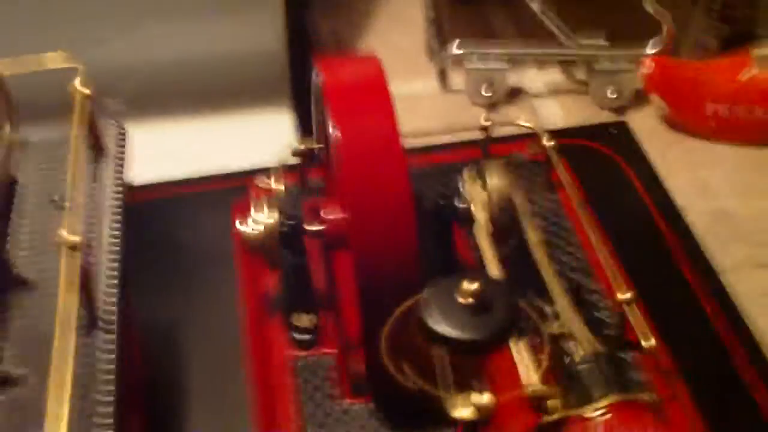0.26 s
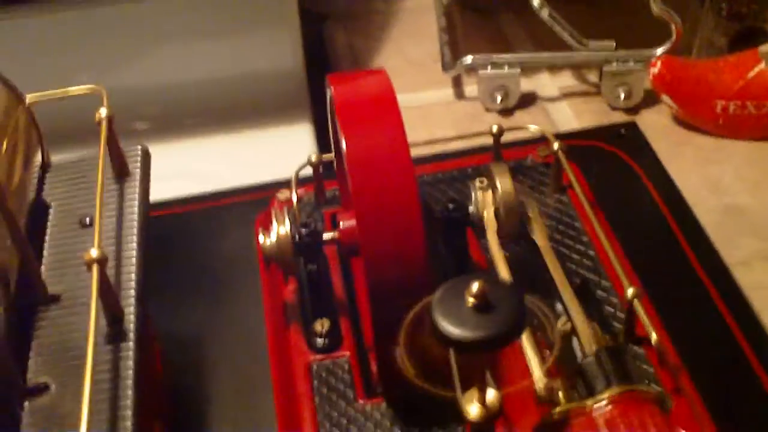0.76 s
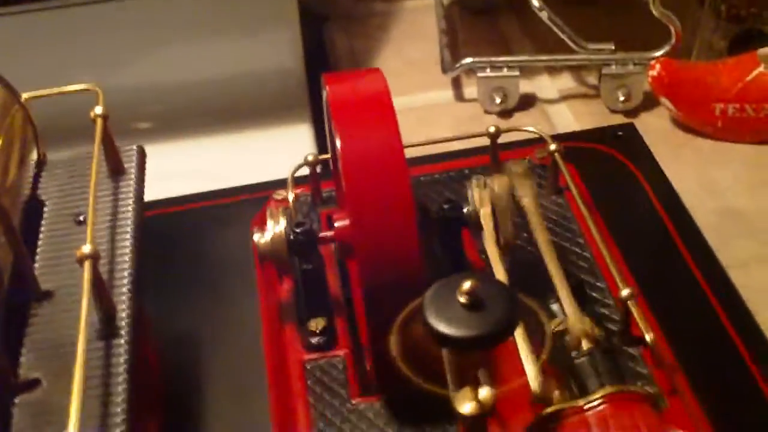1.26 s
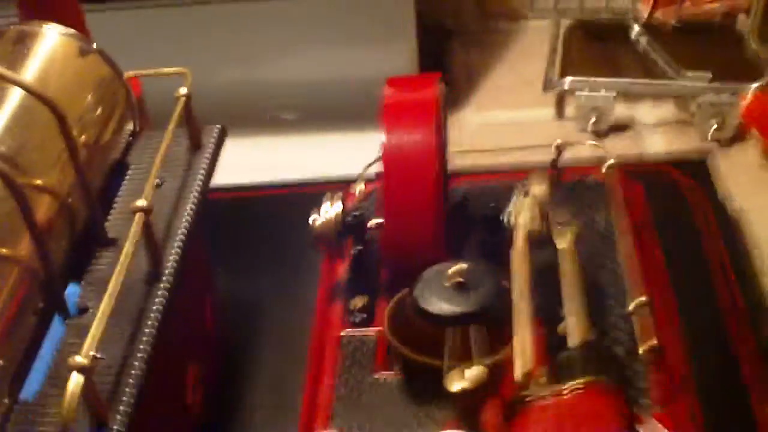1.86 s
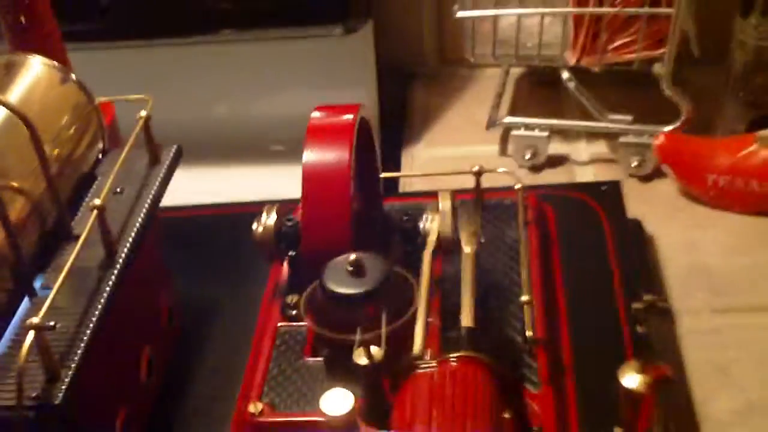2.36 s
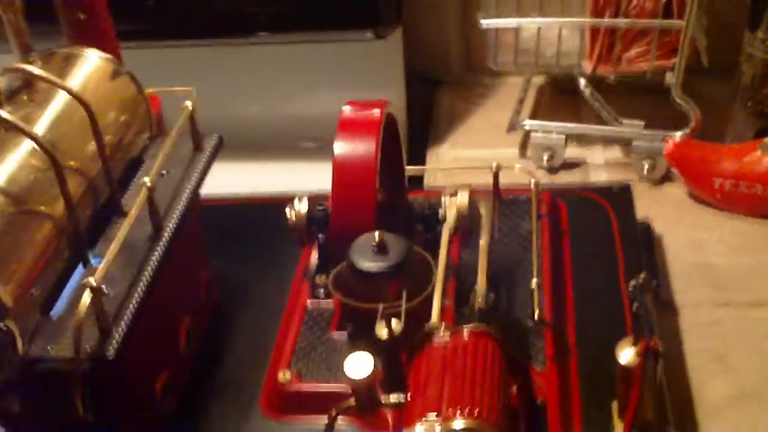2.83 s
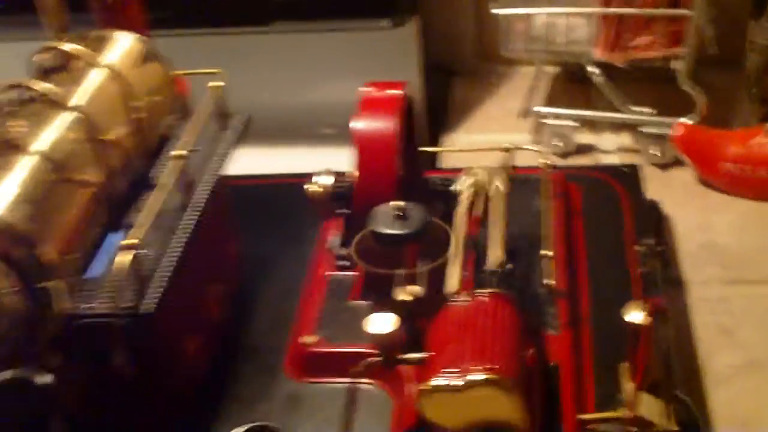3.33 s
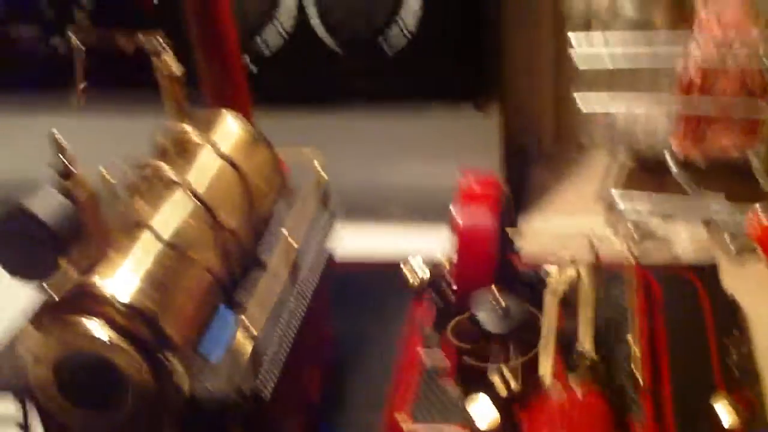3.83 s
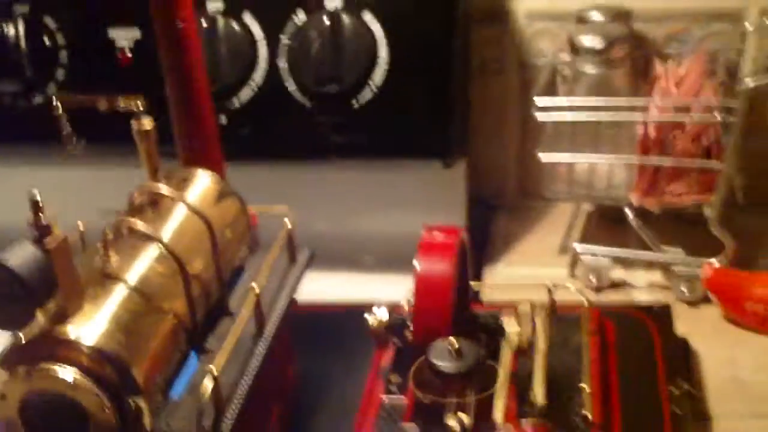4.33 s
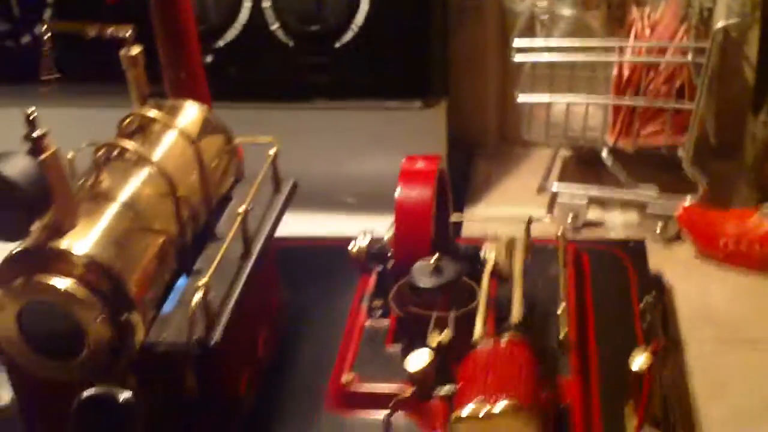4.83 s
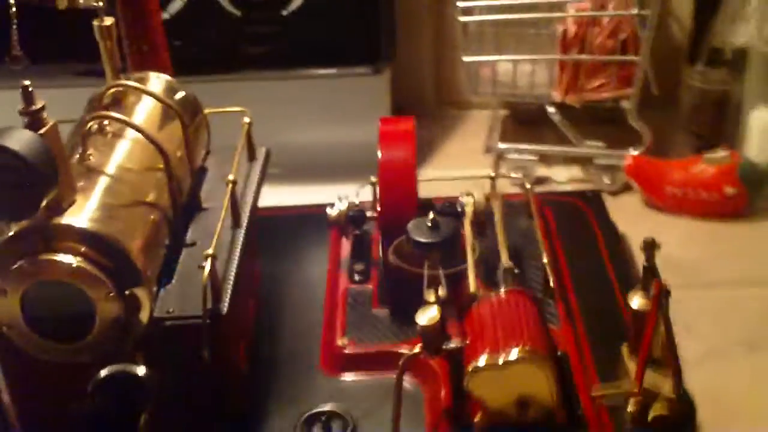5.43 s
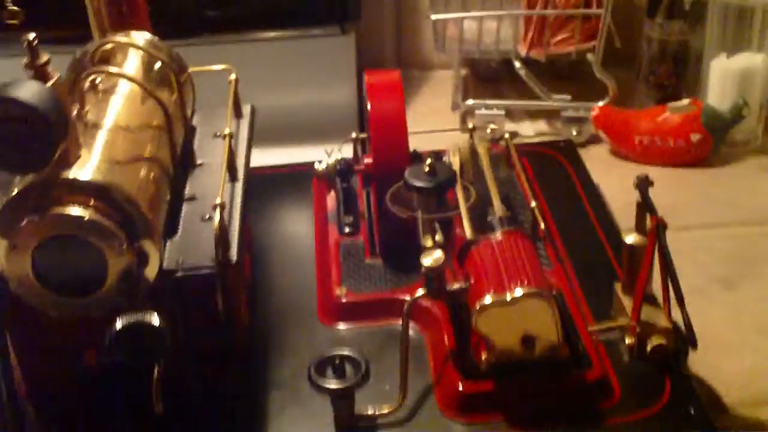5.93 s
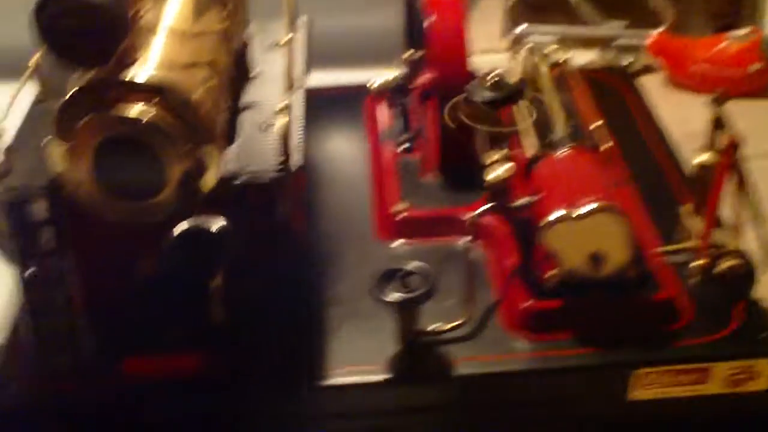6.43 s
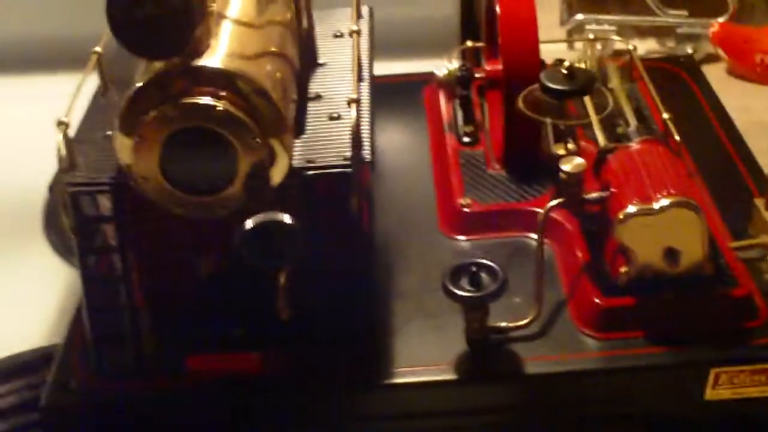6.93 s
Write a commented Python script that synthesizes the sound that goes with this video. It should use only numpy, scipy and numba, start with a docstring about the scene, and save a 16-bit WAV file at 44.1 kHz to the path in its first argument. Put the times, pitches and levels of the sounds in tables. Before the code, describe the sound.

A small model steam engine runs steadily on a kitchen worktop, with quick, light exhaust puffs and a thin boiler hiss over a droning fan. Right at the start, a small bird close by whistles two piercing chirps with a faint hoarse one between them. They are far louder than the engine, buzz harshly at their peaks and ring briefly in the room. The engine and fan then carry on alone.

```python
"""Model steam engine and pet bird.

A model steam engine ticks over on a kitchen worktop, two exhaust puffs a turn, its boiler hissing.
A fan drones in the room. A small bird close by whistles two piercing chirps with a faint hoarse one
between them, and the room rings on. The camera drifts towards the boiler. It turns its gain down for
the chirps, yet its 24 kHz converter overflows into a harsh buzz at their peaks."""
import sys
import numpy as np
from scipy import signal
from scipy.fft import rfft, irfft
from scipy.io import wavfile
from numba import njit

SR = 44100
rng = np.random.default_rng(int(sys.argv[2]) if len(sys.argv) > 2 else 0)


def pcm_store(signal):
    """Save signal as 16-bit PCM."""
    levels = np.round(np.clip(np.atleast_2d(signal), -1, 1) * 32767)
    wavfile.write(sys.argv[1], SR, levels.astype(np.int16).T)


N = 317079
TIME = np.arange(N) / SR
FREQ = np.fft.rfftfreq(N, 1 / SR)


def undb(db):
    """Decibels to gain."""
    return 10 ** (np.asarray(db) / 20)


def unit_rms(x):
    """Scale to rms 1."""
    return x / np.sqrt(np.mean(x ** 2))


def curves(table):
    """One per-sample curve for each value column of a table of timed rows."""
    times_s, *columns = np.transpose(sorted(map(tuple, table)))
    return [np.interp(TIME, times_s, column) for column in columns]


def spectrum(points):
    """Gain over frequency through (Hz, dB) points, silent above the last."""
    hz, db = np.transpose(points)
    return undb(np.interp(np.log(FREQ + 1), np.log(hz), db, right=-200))


def resonances(modes):
    """Gain over frequency of (Hz, width in Hz, dB) peaks."""
    return sum(undb(db) / (1 + ((FREQ - hz) / (0.63 * width)) ** 2) for hz, width, db in modes)


def noise(gain):
    """Noise with the given amplitude per root Hz."""
    return irfft(rfft(rng.standard_normal(N)) * gain, N) * np.sqrt(SR / 2)


def wander(rate_hz):
    """Smooth random motion, rms 1."""
    return unit_rms(noise(np.exp(-(FREQ / rate_hz) ** 2)))


def swell(middle_s, length_s):
    """Flat-topped rise from 0 to 1 and back."""
    return np.exp(-(2 * (TIME - middle_s) / length_s) ** 4)


# Rush of the fan's air. Each row: frequency in Hz, relative density in dB.
AIR_SPECTRUM = [(30, -78.5), (80, -77.5), (100, -74.5), (150, -79.5), (225, -72), (265, -80), (410, -78),
                (600, -77), (900, -75), (1080, -78.5), (1600, -86.5), (2750, -90), (3500, -95),
                (4300, -112)]
# Fan duct. Each row: centre in Hz, width in Hz, relative density in dB.
DUCT_MODES = [(540.77, 30, -74.5), (729.3, 50, -76), (1793, 110, -85)]
# Hollow between boiler and base plate. Each row: centre in Hz, width in Hz, relative density in dB.
HOLLOW_MODES = [(318, 53, -75.5), (458, 121, -81.5)]
# Each row: multiple of the fan speed, relative level in dB away from the boiler, the same near it.
FAN_TONES = [(1, -52.5, -54), (3, -60, -61.5), (4, -52, -59.5), (5, -59, -53.5), (9, -68.5, -55),
             (11, -49.5, -56.5), (13, -57, -63), (14, -57, -53), (15, -52.5, -53), (16, -53.5, -53.5),
             (17, -71.5, -67), (18, -64.5, -67.5), (31, -70, -66.5)]
# Each row: frequency in Hz, relative level in dB.
MOTOR_HUM = [(120, -61.5), (360, -55.5), (600, -55.5)]


def fan(nearness, speed_hz=57.95, drift=.0015, throb=.07, flutter_db=0.47, waver_db=3.5, tone_db=-3.0):
    """Air throbs once a revolution; tones waver at random, as when moving through standing waves."""
    angle = 2 * np.pi * np.cumsum(speed_hz * (1 + drift * wander(3))) / SR
    air = noise(spectrum(AIR_SPECTRUM)) + noise(resonances(DUCT_MODES))
    air += nearness * noise(resonances(HOLLOW_MODES))
    air *= (1 + throb * np.cos(angle)) * undb(flutter_db * wander(8.2))
    tones = [(round(order) * angle, far + nearness * (near - far)) for order, far, near in FAN_TONES]
    tones += [(2 * np.pi * hz * TIME, db) for hz, db in MOTOR_HUM]
    drone = np.zeros(N)
    for phase, db in tones:
        drone += undb(tone_db + db + waver_db * wander(5)) * np.sin(phase + rng.uniform(0, 2 * np.pi))
    return air + drone


# Each row: frequency in Hz, relative density in dB.
LEAK_SPECTRUM = [(2000, -112), (3950, -103), (4200, -94.5), (4600, -94), (5350, -100), (5900, -95),
                 (6600, -94), (7400, -97.5), (8200, -102), (9000, -101), (9900, -104), (10400, -111),
                 (11300, -115), (12000, -126)]


def boiler(nearness, near_db=1.07, flicker_db=0.07):
    """A thin, even steam leak, slightly louder close by."""
    return noise(spectrum(LEAK_SPECTRUM)) * undb(near_db * (nearness - 1.5) - flicker_db * wander(12))


def puffs(starts_s, levels_db, decay_s, opening_s=.002):
    """Steam flow: the valve opens quickly, then the cylinder empties."""
    flow, age = np.zeros(N + SR), TIME[:SR // 8]
    shape = (1 - np.exp(-(age / opening_s) ** 2)) * np.exp(-age / decay_s)
    for start_s, db in zip(starts_s, levels_db):
        start = max(int(start_s * SR), 0)
        flow[start:start + len(age)] += undb(db) * shape
    return flow[:N]


# Each row: time in seconds, speed in turns per second.
FLYWHEEL_SPEED = [(0, 5.696), (2.2, 5.763), (4.1, 5.76), (4.7, 5.665), (7.2, 5.868)]
# Each row: time in seconds, relative puff level in dB.
PUFF_LEVELS = [(0, -55.5), (1.9, -53.5), (3.1, -55.5), (4.7, -53.5), (5.3, -52), (6.1, -54), (7.2, -54)]
# Exhaust pipe. Each row: centre in Hz, width in Hz, relative level in dB.
EXHAUST_MODES = [(1320, 400, -10.5), (2370, 2000, 7.5), (3100, 721, -19.5), (4730, 550, -0.5),
                 (5652, 290, -6), (6900, 537.5, -11.5), (8400, 900, -12)]


def engine(first_puff_s=.168):
    """The two cylinder ends blow through the pipe half a turn apart; the return stroke is less even."""
    turns = np.cumsum(curves(FLYWHEEL_SPEED)[0]) / SR
    turns -= np.interp(first_puff_s, TIME, turns)
    whole_turns = np.arange(int(turns[-1]) + 1)
    steam_db, = curves(PUFF_LEVELS)

    def stroke(at_turns, gain_db, scatter_db, decay_s):
        """One puff each time the crank passes the same angle."""
        starts_s = np.interp(at_turns, turns, TIME)
        levels_db = np.interp(starts_s, TIME, steam_db) + gain_db
        return puffs(starts_s, levels_db + scatter_db * rng.standard_normal(len(starts_s)), decay_s)

    out_flow = stroke(whole_turns, gain_db=6.6, scatter_db=0.7, decay_s=0.018)
    return_flow = stroke(whole_turns + .5, gain_db=6.0, scatter_db=2.0, decay_s=0.0067)
    return (out_flow + return_flow) * unit_rms(noise(resonances(EXHAUST_MODES)))


def arch(start_s, length_s, top_hz, jitter, sag_hz=640, flat_share=.33, attack_s=.007, release_s=.016):
    """Phase and envelope of one bird note: the pitch rises, levels off and falls."""
    age = TIME - start_s
    flank = np.clip((np.abs(2 * age / length_s - 1) - flat_share) / (1 - flat_share), 0, 1)
    hz = (top_hz - sag_hz * flank ** 2) * (1 + jitter * wander(300))
    envelope = np.clip(age / attack_s, 0, 1) * np.clip((length_s - age) / release_s, 0, 1)
    return 2 * np.pi * np.cumsum(hz) / SR, envelope


# Each row: centre in Hz, width in Hz, relative level in dB.
THROAT_MODES = [(4540, 1800, -6.5), (6380, 780, -1.5), (9497, 6000, -15)]


def throat_rasp():
    """Noise shaped by the bird's throat, rms 1."""
    return unit_rms(noise(resonances(THROAT_MODES)))


def hoarse_chirp(start_s=.278, length_s=.065, top_hz=4800, low_hz=3430, jitter=.015, broken_share=.7,
                 whistle_db=-30, break_db=-26, low_db=-39, rasp_db=-40, rasp_rise_db=7):
    """A weakly blown whistle that breaks midway into rasp and a shaky lower note."""
    broken = swell(start_s + length_s / 2, broken_share * length_s)
    phase, envelope = arch(start_s, length_s, top_hz, jitter)
    low_phase, _ = arch(start_s, length_s, low_hz, jitter)
    whistle = undb(whistle_db + break_db * broken) * np.sin(phase)
    low_note = undb(low_db) * broken * np.sin(low_phase)
    rasp = undb(rasp_db + rasp_rise_db * broken) * throat_rasp()
    return envelope * (np.sqrt(2) * (whistle + low_note) + rasp)


# Each row: start in seconds, length in seconds, top pitch in Hz, then in seconds: time of the hardest
# push, length of the push, time at which the cracked start ends.
LOUD_CHIRPS = [(-.012, .082, 4734, .036, .029, .016), (.639, .119, 4632, .695, .064, 0)]


def loud_chirp(start_s, length_s, top_hz, push_s, push_length_s, cracked_until_s,
               whistle_db=-2.3, push_db=8.2, fade_db_per_s=50, shimmer_db=0.55, octave_db=-33,
               crack_db=-11.5, cracked_whistle_db=-13, cracked_rasp_db=9, mend_s=0.0049,
               rasp_db=-22.5, lead_db=-19, lead_s=.026):
    """An arched whistle, pushed hard midway, led in by rasp; a crack adds a tone at 2.5 times the pitch."""
    phase, envelope = arch(start_s, length_s, top_hz, jitter=.002)
    cracked = (1 - np.tanh((TIME - cracked_until_s) / mend_s)) / 2
    level_db = whistle_db + push_db * swell(push_s, push_length_s) + cracked_whistle_db * cracked
    level_db -= fade_db_per_s * np.clip(TIME - push_s, -length_s, length_s)  # the bird runs out of air
    level_db += shimmer_db * wander(250)
    whistle = undb(level_db) * (np.sin(phase) + undb(octave_db) * np.sin(2 * phase))
    crack = undb(crack_db) * cracked * np.sin(2.5 * phase + wander(250))
    rasp = undb(rasp_db + cracked_rasp_db * cracked) * throat_rasp()
    lead_in = undb(lead_db) * swell(start_s, lead_s) * rasp
    return envelope * (np.sqrt(2) * (whistle + crack) + rasp) + lead_in


def room(x, t60_s=0.32, echo_db=-13, first_echo_s=0.0077):
    """Direct sound, then dense echoes from hard kitchen walls."""
    age = TIME[:SR]
    tail = rng.standard_normal(SR) * np.exp(-np.log(1000) * age / t60_s) * (age > first_echo_s)
    return x + undb(echo_db) * signal.fftconvolve(x, tail / np.linalg.norm(tail))[:N]


# Each row: time in seconds, gain of fan and boiler in dB, nearness to the boiler from 0 to 1.
BOILER_APPROACH = [(0, 4, 0.06), (1.1, 0.97, .05), (2.3, 2.13, 0), (3.2, .5, 0.19), (3.6, 2.5, .35),
                   (5.4, 4, .76), (6.2, 3.5, 0.97), (7.2, 4, 1)]


def scene():
    """Fan, boiler and engine run on while the bird calls."""
    gain_db, nearness = curves(BOILER_APPROACH)
    background = undb(gain_db) * (fan(nearness) + boiler(nearness))
    bird = room(sum(loud_chirp(*row) for row in LOUD_CHIRPS) + hoarse_chirp())
    return (background + engine() + bird)[None]


@njit
def follow(magnitude, attack_s, release_s):
    """Envelope follower with separate rise and fall times."""
    envelope, level = np.empty(len(magnitude)), magnitude[0]
    for i in range(len(magnitude)):
        level += (magnitude[i] - level) / (SR * (attack_s if magnitude[i] > level else release_s))
        envelope[i] = level
    return envelope


FULL_SCALE = .68


def gain_control(x, threshold_db=-26, range_db=9, ceiling=1.13 * FULL_SCALE):
    """Turns loud sound down over a limited range; a fast limiter leaves peaks just over full scale."""
    magnitude = np.abs(signal.hilbert(x))
    level = follow(magnitude, attack_s=0.00028, release_s=0.065)
    gain = np.clip(undb(threshold_db) / level, undb(-range_db), 1)
    peak = follow(magnitude * gain, attack_s=.0003, release_s=.005)
    return x * gain * ceiling / np.maximum(peak, ceiling)


def converter(x, rate_hz=24000):
    """Samples beyond full scale wrap to the other sign; playing each one twice mirrors the treble."""
    sampled = signal.resample_poly(x, rate_hz, SR, window=("kaiser", 2))
    wrapped = (sampled + FULL_SCALE) % (2 * FULL_SCALE) - FULL_SCALE
    return signal.resample_poly(np.repeat(wrapped, 2), SR, 2 * rate_hz)[:N]


LOW_CUT_HZ, TOP_CUT_HZ = 280, 15400


def record(dry):
    """Gain control, overflowing converter, gentle low cut, steep top cut."""
    sound = converter(gain_control(dry[0]))
    sound = signal.sosfilt(signal.butter(1, LOW_CUT_HZ, "high", fs=SR, output="sos"), sound)
    top_cut = signal.firwin(401, TOP_CUT_HZ, window=("kaiser", 9), fs=SR)
    return signal.fftconvolve(sound, top_cut, "same")[None]


dry = scene()
out = record(dry)
pcm_store(out)
```